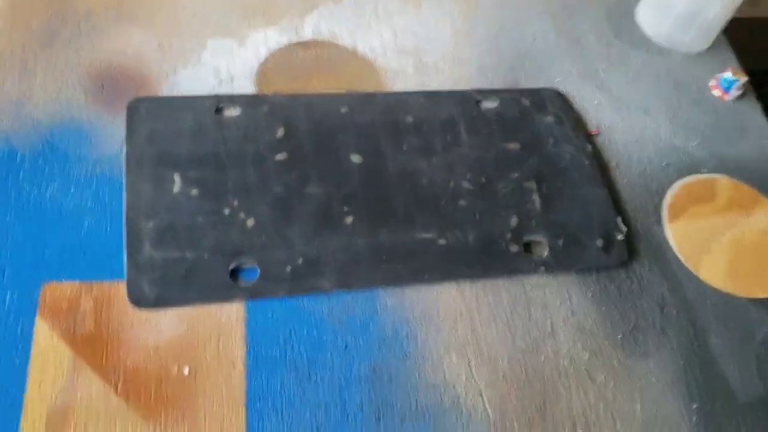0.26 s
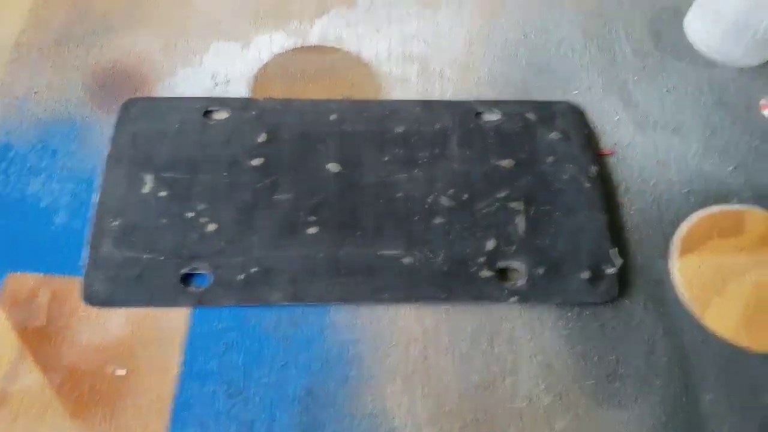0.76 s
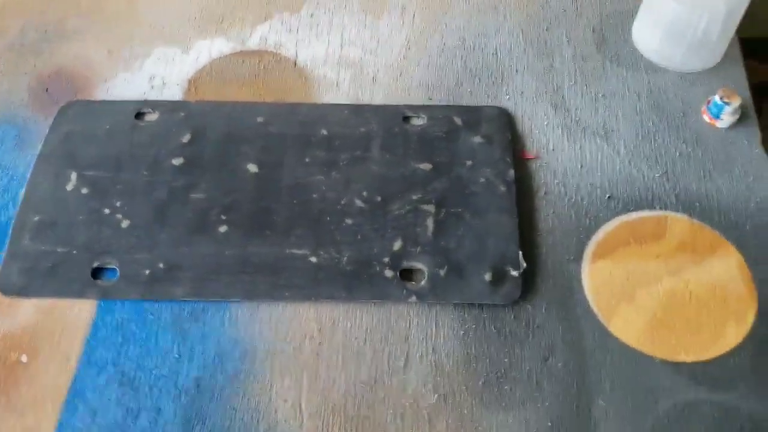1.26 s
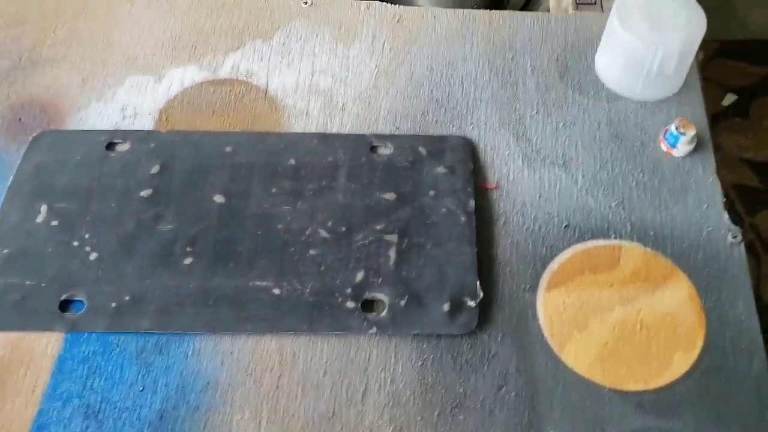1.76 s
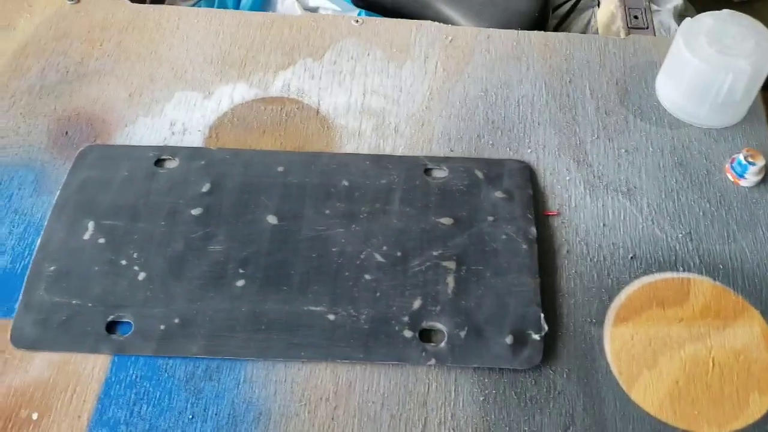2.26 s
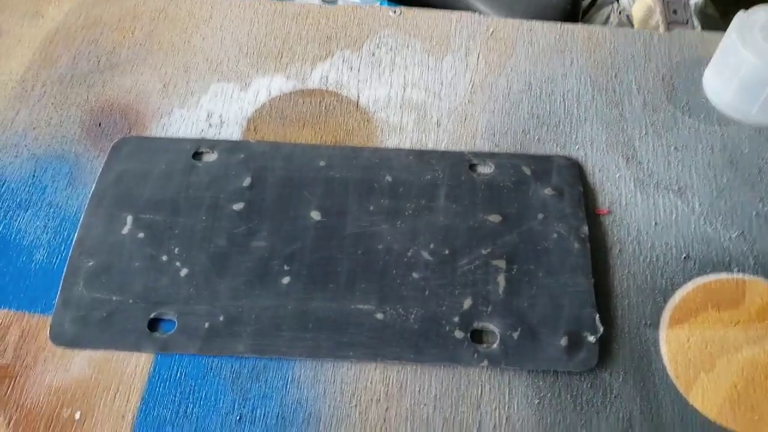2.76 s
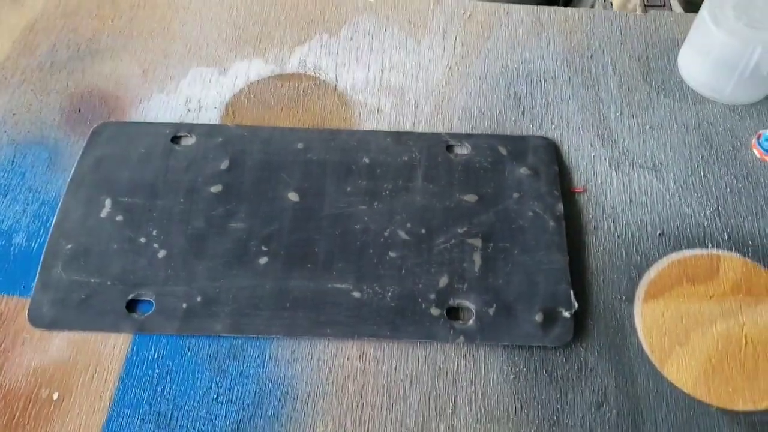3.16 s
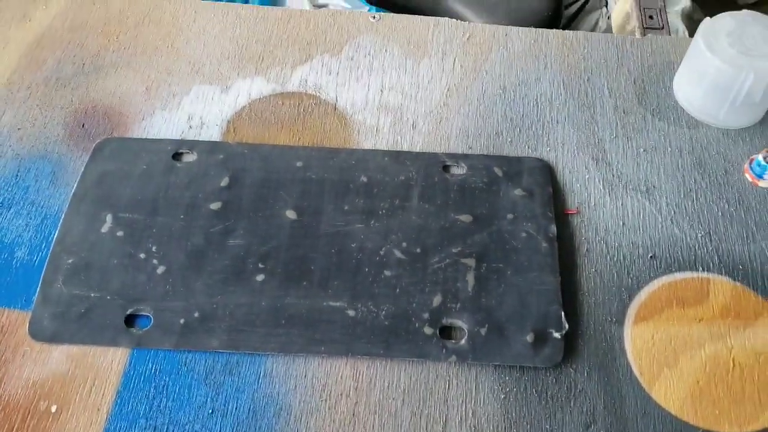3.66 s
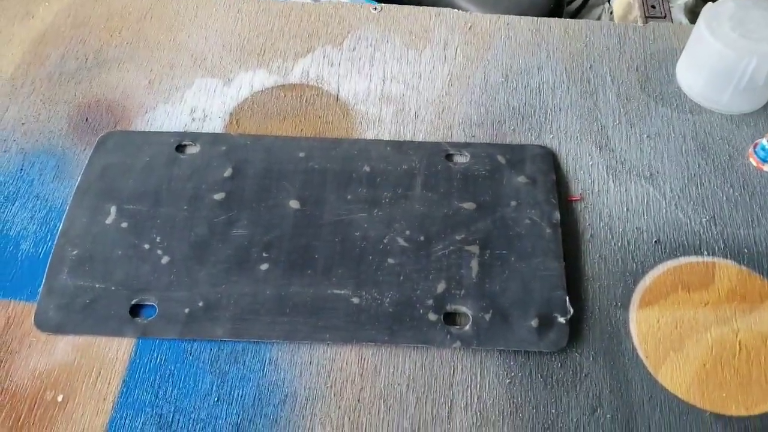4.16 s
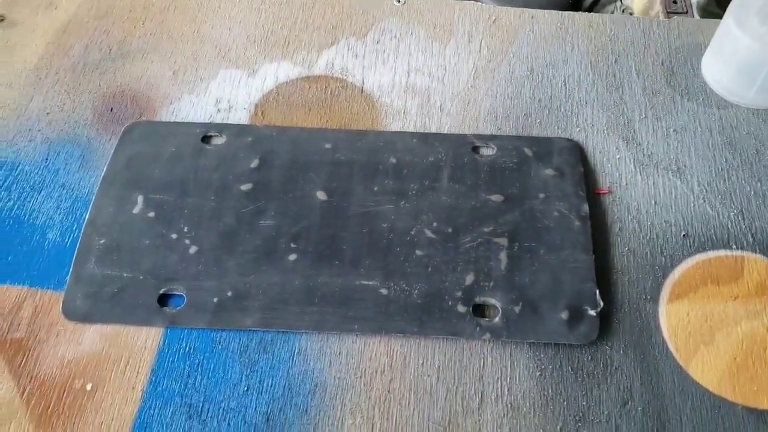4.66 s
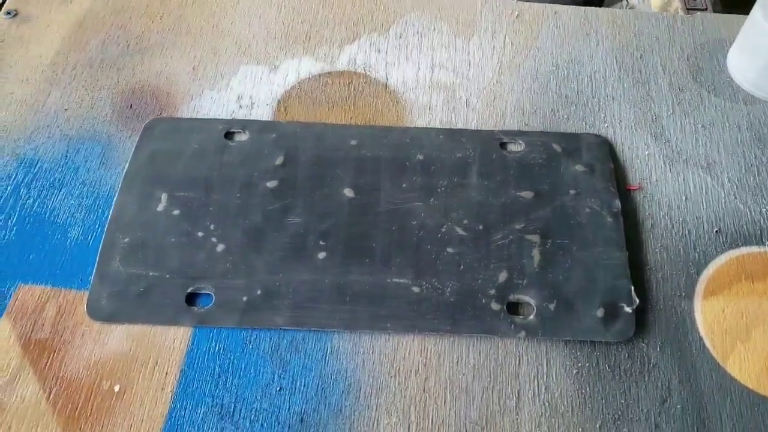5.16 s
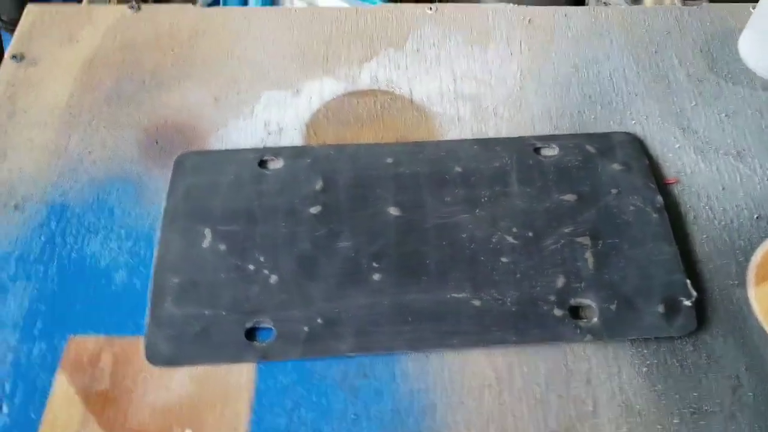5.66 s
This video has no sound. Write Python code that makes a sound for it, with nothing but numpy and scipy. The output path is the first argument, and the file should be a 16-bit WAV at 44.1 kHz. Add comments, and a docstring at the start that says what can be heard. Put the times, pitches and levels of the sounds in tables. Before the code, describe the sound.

A spray paint can is shaken close by, its mixing ball clacking rapidly against the metal, slackening briefly, then rattling on and fading.

```python
"""Hard, quick clacks: a spray paint can is shaken beside a phone, over a work table in a small workshop.
The mixing ball strikes the steel wall again and again, hard and soft, some strikes duller than others;
each is a shaped noise burst that the paint damps within milliseconds. The shaking slackens once, resumes
and dies away. Dull decaying sines are the can jolting in the hand; noise tails give each clack its echo.
Beneath lie filtered-noise air, a faint hum that swells toward the end and a brief rumble of the grip."""
import sys
import numpy as np
from scipy import signal
from scipy.fft import rfft, irfft
from scipy.io import wavfile

SR = 44100
rng = np.random.default_rng(int(sys.argv[2]) if len(sys.argv) > 2 else 0)


def log_audio(samples):
    """Write samples as a 16-bit WAV file to the path given in sys.argv[1]."""
    # one column per channel
    frames = np.atleast_2d(samples).T
    # limit to full scale, then quantise
    limited = np.clip(frames, -1, 1)
    pcm = np.round(limited * 32767).astype(np.int16)
    wavfile.write(sys.argv[1], SR, pcm)


N = 261513
BURST_SIZE = 1024  # samples in one impact
ONSET = BURST_SIZE // 4  # sample at which contact begins

# how the can is held, heard in the direct sound: time_s, gain_db
HOLD_LEVEL = [(.3, -5.5), (1.1, -6), (1.25, 0.5), (1.45, -3), (1.8, -3.5), (2, -1), (4.2, 3), (5.9, 2.5)]
# dull thuds of the can in the hand: start_s, level_db, pitch_hz
HAND_THUDS = [(0.03, -37, 150), (.27, -44.5, 85), (.768, -38, 605), (1.686, -47, 160), (2.424, -39, 230),
              (2.452, -30.5, 430), (2.473, -41, 95), (3.023, -43, 96.5), (4.79, -45, 111)]
# ring of the paint-damped wall: frequency_hz, gain_db
WALL_COLOUR = [(100, -30), (450, -7.5), (900, -1.5), (1300, 0), (2100, 2), (2900, 1.5), (3900, -0.5),
               (5700, 0.5), (6600, -20), (7700, -20), (9500, -38)]
# sharp tick of contact: frequency_hz, gain_db
TICK_COLOUR = [(4000, -24), (7600, 3), (10000, -5.5), (11700, 2), (13500, 0.5), (16000, -8.5)]
# left port minus right port: frequency_hz, difference_db
PORT_BALANCE = [(400, -2), (1200, 1.5), (2400, 5.5), (4400, 4), (8000, 1.5), (11500, 0), (15500, -3.5)]
# colour of the reflections: frequency_hz, gain_db
ROOM_COLOUR = [(200, 7), (500, -1), (1200, -1.5), (3000, -4.5), (16000, 0)]
# still air of the workshop: frequency_hz, density_db (per Hz, relative)
AIR_COLOUR = [(30, -20), (85, 3), (140, -5), (320, -14), (500, -2), (1200, -9.5), (4000, -17.5),
              (16000, -21)]
# strikes of the ball on the wall, hard and soft, bright and dull, each with its own ring and tick:
# start_s, level_db, ring_centre_hz (of the struck spot), tick_db (relative)
VOICED_STRIKES = [(0.0327, -7, 3260, -5.5), (0.0635, -13.5, 2340, -26), (0.1267, -7.5, 3560, -6.5),
                  (0.1465, -6.5, 3520.0, -28), (0.2706, -8, 2930, -5.0), (0.3599, -6.5, 3570, -11),
                  (0.6202, -15, 3460, -12.5), (0.7783, -14, 3840, -9), (1.1312, -16, 3200.0, -20.0),
                  (1.2494, -17, 3470, 0), (1.3284, -32.5, 2570.0, -12.5), (1.4529, -24.5, 3900, -9.5),
                  (1.4983, -29, 3260, -7.5), (1.5424, -29, 3440, -33), (1.6969, -28, 2530, -10.5),
                  (1.7222, -26.5, 2220, -15.0), (1.784, -27.5, 2230, -17), (1.8083, -26, 1800.0, -8),
                  (1.8849, -12, 2780, -3), (2.0261, -25.5, 2720.0, -4), (2.1032, -9.5, 2960, -18),
                  (2.1094, -19, 3060, -18), (2.1298, -10.0, 2930, -8.5), (2.1962, -9.5, 3300, -5),
                  (2.2347, -8.5, 3500, -9), (2.2539, -12.0, 3100, -23), (2.2798, -11, 3070, -10),
                  (2.4114, -8.5, 3840, -13.0), (2.4737, -10, 3570, -7), (2.5505, -12.5, 3180, -15),
                  (2.6402, -11, 3660, -17.5), (2.699, -23.0, 2200, -14.0), (2.7366, -13, 2980.0, -15),
                  (2.8617, -12, 3700, -13), (2.9416, -18, 3200, -9), (3.0238, -12, 3760, -7),
                  (3.1071, -15.5, 3500.0, -10), (3.3566, -18, 3800, -13), (3.4894, -14.5, 4160, -15.5),
                  (3.5804, -21.5, 3900, 1), (3.656, -18, 3870, -12.0), (3.8055, -13.5, 3470, -12),
                  (3.8562, -19.0, 4530, -10.5), (3.9091, -17.0, 4100, -7), (3.9862, -19, 3500, -28),
                  (3.991, -17.5, 2760, -11.5), (4.0736, -19, 3400, -11.5), (4.1504, -24, 2170, -26.0),
                  (4.1555, -19.5, 3840.0, -17), (4.1704, -18.5, 3460, -12.5), (4.2227, -14.5, 3480, -6),
                  (4.2983, -17, 3250, -9.5), (4.3177, -16, 3040.0, -9.5), (4.3897, -16, 3730, -15),
                  (4.5384, -15, 3250, -8.5), (4.5995, -17, 3700, -10.5), (4.6177, -19, 3530, -17),
                  (4.6322, -16.5, 3260, -13), (4.6933, -15.5, 3130, -9), (4.845, -15.5, 3500, -4.5),
                  (4.9227, -13.5, 3360, -17), (4.9345, -16.5, 3600, -10), (4.9992, -15.5, 3380, -7.0),
                  (5.0181, -15.5, 3150, -8.5), (5.069, -15.5, 2750, -13), (5.0859, -16, 3850, -8.5),
                  (5.1542, -23, 3990.0, -9.5), (5.2079, -19.5, 4180, -17), (5.3216, -26.5, 2380.0, -24),
                  (5.3311, -24.5, 3970, -17), (5.3643, -22.0, 3580, -12.0), (5.4007, -18.5, 3070.0, -11.5),
                  (5.4635, -19.5, 3700, -21), (5.5728, -23.5, 3230, -14), (5.6231, -35.5, 3150, -6),
                  (5.7115, -29, 4640, -5)]
# further strikes of the ball, hard and soft, whose ring and tick are drawn at random: start_s, level_db
DRAWN_STRIKES = [(0.0872, -12.0), (0.1104, -19.0), (0.1632, -11), (0.1786, -10), (0.1935, -22),
                 (0.2552, -30.5), (0.299, -10), (0.3125, -8), (0.3837, -8.5), (0.4139, -11.5),
                 (0.4263, -20.5), (0.4401, -17.5), (0.4571, -17.5), (0.541, -17.5), (0.6355, -16),
                 (0.6996, -20.5), (0.789, -19), (0.8002, -18.5), (0.8119, -17), (0.847, -21.5),
                 (0.8964, -16), (0.949, -11), (0.9595, -20.0), (1.0199, -26.5), (1.0317, -18.5),
                 (1.044, -19.5), (1.065, -23), (1.1554, -20.5), (1.2781, -29.5), (1.5616, -26),
                 (1.5874, -30), (1.8937, -14.5), (1.9162, -12.5), (1.93, -20), (1.938, -13), (1.9447, -18),
                 (1.9591, -14), (2.0465, -13.5), (2.0725, -24), (2.212, -24.5), (2.323, -22),
                 (2.3299, -16.0), (2.3378, -14), (2.345, -17.5), (2.3797, -25), (2.4528, -17.5),
                 (2.4958, -20), (2.5121, -16.5), (2.5407, -14.5), (2.5797, -16), (2.59, -15),
                 (2.6561, -21.5), (2.7483, -20), (2.785, -16.5), (2.8179, -19.5), (2.8769, -25.5),
                 (2.91, -20.5), (2.9669, -25.0), (2.9741, -20), (3.0634, -30), (3.09, -27.0), (3.1244, -18),
                 (3.133, -21), (3.151, -25), (3.168, -22), (3.1816, -24), (3.1902, -22), (3.2056, -25.5),
                 (3.22, -18.5), (3.2759, -22), (3.281, -19.5), (3.2884, -21), (3.3639, -19.5),
                 (3.3818, -22), (3.3907, -20), (3.4155, -20), (3.4477, -23), (3.4684, -32.5),
                 (3.515, -24.5), (3.5409, -22), (3.6193, -23), (3.6907, -23), (3.7032, -20.5),
                 (3.7197, -21.5), (3.7426, -23), (3.7487, -19.5), (3.7604, -23.5), (3.9267, -22.5),
                 (3.9655, -21.5), (4.2445, -19.5), (4.3981, -26.5), (4.4414, -27.5), (4.4623, -19.5),
                 (4.4832, -23.5), (4.5676, -24), (4.7093, -20.5), (4.7384, -22), (4.7674, -22),
                 (4.7907, -23.5), (4.8212, -32), (4.869, -21.5), (4.9027, -27.5), (5.1072, -29),
                 (5.1615, -24.5), (5.1952, -28.5), (5.2023, -22.5), (5.2188, -23), (5.2646, -32),
                 (5.4225, -26.5), (5.4761, -22), (5.4953, -38), (5.6502, -36), (5.6747, -40.5),
                 (5.7554, -42), (5.7983, -42), (5.8628, -42), (5.904, -42)]


def undb(db):
    """Decibels to amplitude."""
    return 10 ** (np.asarray(db) / 20)


def unit(x):
    """Scale a sound to an RMS of one."""
    return x / np.sqrt(np.mean(x ** 2))


def colour(points, size):
    """Gain at each frequency bin, from (Hz, dB) points joined on a log frequency axis."""
    hz, db = np.transpose(points)
    bins_hz = np.fft.rfftfreq(size, 1 / SR) + 1
    return undb(np.interp(np.log(bins_hz), np.log(hz), db))


def tint(x, points):
    """Filter a sound by (Hz, dB) points."""
    size = x.shape[-1]
    return irfft(rfft(x) * colour(points, size), size)


def add(out, x, start_s):
    """Mix a short sound into the stereo output at its start time."""
    i = max(int(start_s * SR), 0)
    part = out[:, i:i + x.shape[-1]]
    part += x[:, :part.shape[-1]]


def port_noise(shape, apart_hz):
    """Noise at two close ports: the same in the bass, more and more unrelated above apart_hz."""
    mid, side = rfft(rng.standard_normal((2,) + shape))
    f = np.fft.rfftfreq(shape[-1], 1 / SR)
    share = .5 * f ** 2 / (f ** 2 + apart_hz ** 2)
    mid, side = mid * np.sqrt(1 - share), side * np.sqrt(share)
    return irfft(np.array([mid + side, mid - side]), shape[-1])


def background(air_db=-63, hum_hz=92, hum_db=-67, grip_s=1.76, grip_width_s=0.18, grip_db=-61):
    """Quiet air, a wavering hum that swells near the end, and a soft rumble as the grip changes."""
    t = np.arange(N) / SR
    air = unit(tint(port_noise((N,), 120), AIR_COLOUR))
    waver = unit(tint(rng.standard_normal(N), [(10, -4), (40, -36)]))
    swell = np.exp((t - t[-1]) / .5)  # full level only at the last moment
    hum = np.sqrt(2) * np.sin(2 * np.pi * hum_hz * t) * (1 + .35 * waver) * swell
    rumble = unit(tint(rng.standard_normal((2, N)), [(30, -19), (90, 5), (250, -6.0), (3000, -18)]))
    grip = rumble * np.exp(-((t - grip_s) / grip_width_s) ** 2)
    return undb(air_db) * air + undb(hum_db) * hum + undb(grip_db) * grip


def room(x, t60_s=0.23, t60_treble_s=0.17, tail_db=-9.5, echo_decay_s=0.00043, echo_db=-14):
    """A near surface throws back a smeared echo; the walls follow with a short tail, shorter in the treble."""
    t = np.arange(SR // 2) / SR
    late = t - .0052  # seconds after the first reflection
    low_pass = signal.butter(2, 6000, fs=SR, output="sos")
    high_pass = signal.butter(2, 6000, "high", fs=SR, output="sos")
    low = signal.sosfilt(low_pass, port_noise(t.shape, 460))
    high = signal.sosfilt(high_pass, rng.standard_normal(low.shape))
    tail = (low * undb(-60 * t / t60_s) + high * undb(-60 * t / t60_treble_s)) * (late > 0)
    echo = port_noise(t.shape, 2100) * (late > 0) * np.exp(-np.abs(late) / echo_decay_s)
    reflections = undb(tail_db) * unit(tail) + undb(echo_db) * unit(echo)
    response = tint(reflections, ROOM_COLOUR) / np.sqrt(len(t))
    return signal.oaconvolve(x, response, axes=-1)[:, :N]


def thuds(cycles=0.55):
    """The can jolts in the hand: a tight knock that dies within a cycle or two."""
    t = np.arange(SR // 8) / SR
    out = np.zeros((2, N))
    for start_s, level_db, pitch_hz in HAND_THUDS:
        knock = np.sin(2 * np.pi * pitch_hz * t) * np.exp(-t * pitch_hz / cycles)
        add(out, (knock * undb(level_db))[None], start_s)
    return out


def drawn_strikes(usual_db=-22, centre_hz=3150, octaves_per_db=0.13, scatter_octaves=.16,
                  tick_db=-11, tick_scatter_db=3):
    """Strikes well below the usual level tend to ring duller; each lands on another spot."""
    start_s, level_db = np.transpose(DRAWN_STRIKES)
    spot, edge = rng.standard_normal((len(start_s), 2)).T
    force_db = np.clip(level_db, usual_db - 12.5, usual_db + 0.5) - usual_db
    ring_hz = centre_hz * 2 ** (octaves_per_db * force_db + scatter_octaves * spot)
    return np.column_stack([start_s, level_db, ring_hz, tick_db + tick_scatter_db * edge])


def chatter(hits, soonest_s=.003, spread_s=.022, loss_db=-16):
    """After each strike the ball touches the wall once more, more faintly."""
    start_s, level_db, ring_hz, tick_db = hits.T
    touch_s = start_s + soonest_s + spread_s * rng.random(len(start_s))
    return np.column_stack([touch_s, level_db + loss_db, ring_hz, tick_db])


def bursts(noise, rise_s, decay_s, even=0.48, linger_db=-21, linger_s=0.004):
    """Spectra of short bursts: many wall modes swell and die together, a few linger."""
    t = np.maximum(np.arange(BURST_SIZE) - ONSET, 0) / SR
    swell = 1 - np.exp(-(t / rise_s) ** 2)
    fade = np.exp(-t / decay_s) + undb(linger_db) * np.exp(-t / linger_s)
    spectra = rfft(noise * swell * fade)
    return spectra / (np.abs(spectra) + 1e-9) ** even  # a clean impact feeds the modes fairly evenly


def ripple(f, count, db, hz):
    """Every contact favours other groups of modes: a comb of its own place and spacing, in dB."""
    place, spacing = rng.random((count, 2)).T[:, :, None]
    return db * np.cos(2 * np.pi * (f / hz * 2 ** (spacing - .5) + place))


def level_bursts(x):
    """Give each burst the energy of 1.3 ms at unit level, averaged over the ports."""
    energy = (x ** 2).mean(0).sum(-1)
    return x / np.sqrt(energy / (0.0013 * SR))[:, None]


def clacks(hits, spot_db=14, spot_octaves=0.49, tick_db=0.3, apart_hz=7000, knock_db=-10):
    """Each strike rings the wall around the pitch of the struck spot, with a sharp tick of contact."""
    start_s, level_db, ring_hz, sharpness_db = hits.T
    count = len(hits)
    noise = port_noise((count, BURST_SIZE), apart_hz)
    f = np.fft.rfftfreq(BURST_SIZE, 1 / SR) + 1
    spot = spot_db * np.exp(-.5 * (np.log2(f / ring_hz[:, None]) / spot_octaves) ** 2)
    height_octaves = np.log2(ring_hz / 3200)
    # low spots flex the whole wall, which lifts the bass
    knock = knock_db * height_octaves[:, None] / (1 + (f / 1400) ** 2)
    wall_gain = colour(WALL_COLOUR, BURST_SIZE) * undb(spot + knock + ripple(f, count, db=4, hz=1793))
    ring = level_bursts(irfft(bursts(noise, rise_s=0.00021, decay_s=0.00064) * wall_gain))
    tick_spectra = bursts(noise, rise_s=0.00011, decay_s=0.00075) * colour(TICK_COLOUR, BURST_SIZE)
    tick = level_bursts(irfft(tick_spectra))
    tick = irfft(rfft(tick) * undb(ripple(f, count, db=4.5, hz=8940)))
    bright = undb(tick_db + sharpness_db)[:, None]
    sounds = (ring + bright * tick) / np.sqrt(1 + bright ** 2) * undb(level_db)[:, None]
    out = np.zeros((2, N))
    for k, start in enumerate(start_s):
        add(out, sounds[:, k], start - ONSET / SR)
    return out


def hold(times_s):
    """Gain of the direct sound in dB at the given times, as the can is held differently."""
    return np.interp(times_s, *np.transpose(HOLD_LEVEL))


def at_ports(direct, reflected, lag_samples=23, bass_lag_share=0.49, bass_hz=1500):
    """Sound reaches the right port first; the low knock spreads widely and lags less."""
    left, right = rfft(direct)
    f = np.fft.rfftfreq(N, 1 / SR)
    lag_s = lag_samples / SR * (1 - (1 - bass_lag_share) * np.exp(-f / bass_hz))
    ports = np.array([left * np.exp(-2j * np.pi * f * lag_s), right]) + rfft(reflected)
    lean = np.sqrt(colour(PORT_BALANCE, N))  # each port has its own colour
    return irfft(ports * np.array([lean, 1 / lean]), N)


def scene(count=6):
    """The rattling can as it reaches two microphone ports, with its room, thuds and background."""
    hits = np.vstack([VOICED_STRIKES, drawn_strikes()])
    hits = np.vstack([hits, chatter(hits)])
    # the can keeps moving, so successive strikes meet different patterns of reflections
    places = [clacks(hits[k::count]) for k in range(count)]
    direct = sum(places) * undb(hold(np.arange(N) / SR))
    reflected = sum(room(x) for x in places)
    return at_ports(direct, reflected) + thuds() + background()


def record(dry, ceiling=1.5, top_hz=16300):
    """The phone rounds the loudest peaks and cuts the top."""
    rounded = ceiling * np.tanh(dry / ceiling)
    return signal.sosfilt(signal.ellip(8, .2, 70, top_hz, fs=SR, output="sos"), rounded)


dry = scene()
out = record(dry)
log_audio(out)
```